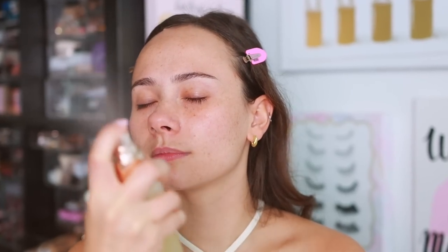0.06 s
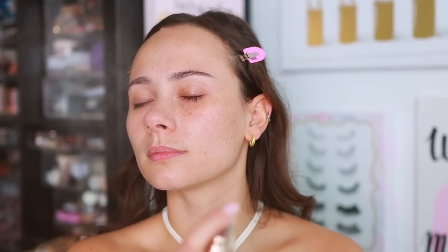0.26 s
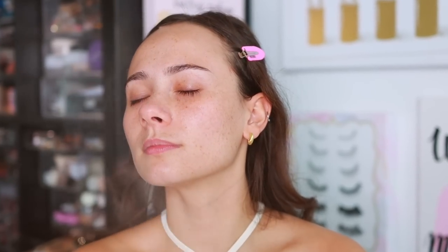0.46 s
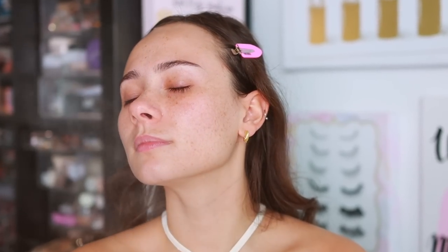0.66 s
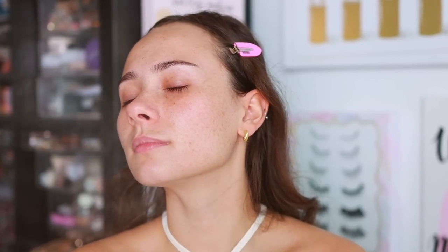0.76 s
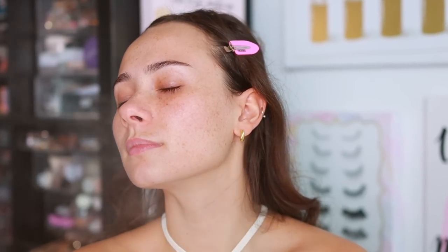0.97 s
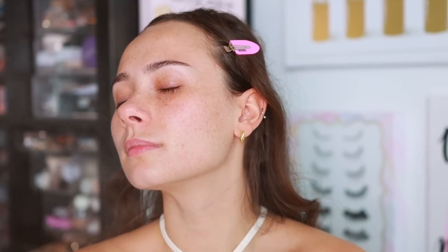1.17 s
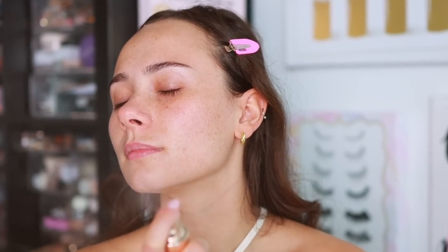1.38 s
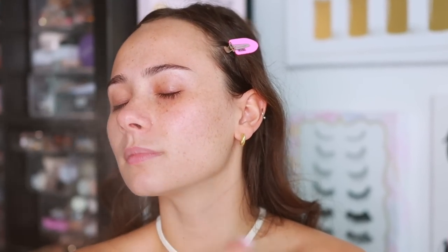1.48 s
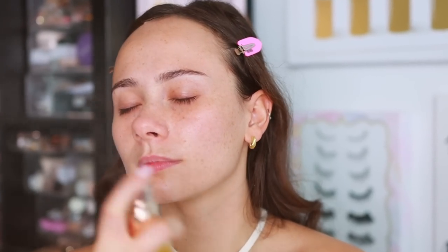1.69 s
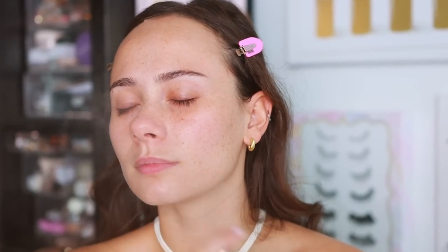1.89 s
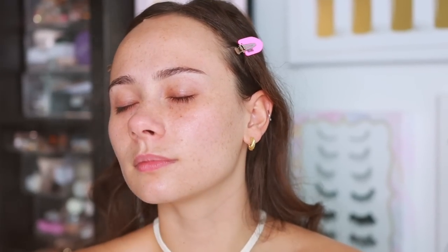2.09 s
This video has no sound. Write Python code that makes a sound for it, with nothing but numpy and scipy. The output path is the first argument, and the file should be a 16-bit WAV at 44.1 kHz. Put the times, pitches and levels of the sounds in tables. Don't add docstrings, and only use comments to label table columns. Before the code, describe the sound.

A small finger-pump mist bottle is pressed five times close to the microphone, each press a short bright hiss, followed by soft plunger knocks and valve ticks, in a quiet furnished room with faint low rumble.

```python
import sys
import numpy as np
from scipy import signal
from scipy.fft import rfft, irfft
from scipy.io import wavfile
from scipy.ndimage import uniform_filter1d

SR = 44100
rng = np.random.default_rng(int(sys.argv[2]) if len(sys.argv) > 2 else 0)


def convert_level_to_amplitude(level_db):
    exponent = np.asarray(level_db, float) / 20
    return 10 ** exponent


def generate_wav(sig):
    pcm = np.round(np.clip(np.atleast_2d(sig).T, -1, 1) * 32767).astype(np.int16)
    wavfile.write(sys.argv[1], SR, pcm)


N = 94550

# start_s, stop_s, top_level_db, top_at_share_of_press, whistle_db
PRESSES = [
    (0.067, 0.2, -34.5, 0.66, -10),
    (0.47, 0.622, -30.5, 0.43, -6),
    (0.911, 1.084, -32, 0.63, -6.5),
    (1.412, 1.566, -33, 0.53, -11),
    (1.836, 2.014, -34.5, 0.53, -6.5),
]
# level_db, highest_hz
REFILLS = [
    (10, 13000),
    (2.5, 14500),
    (3.5, 10900),
    (1.5, 18000),
    (4, 10600),
]
# frequency_hz, density_db
JET_SPECTRUM = [(1000, -44.5), (1400, -17), (1700, -6.5), (2400, -3), (7300, 2), (10400, -6.5), (13000, -1),
                (16000, -13.5)]
# frequency_hz, width_hz, level_db, rise_over_press_hz
NOZZLE_MODES = [(8356, 1400, 0, 501.5), (12530, 3500, -20, 203.5), (6130, 500, -22.5, 2.5)]
# start_s, peak_db, pitch_hz, length_s
PIPS = [(0.069, -55.5, 2130, .004), (0.469, -56, 2000, 0.0023), (.624, -27, 1843, 0.0051),
        (0.9117, -46, 1900, 0.0061), (1.413, -55.5, 1800, .004), (1.639, -64.5, 2000, 0.01),
        (1.837, -49.5, 1880, 0.0066), (2.0272, -35.5, 1905, 0.0041), (2.0816, -41.5, 2200, 0.0038),
        (2.089, -48.5, 2000, 0.0036), (2.12, -64, 3860, 0.003)]
# start_s, peak_db, blow_pitch_hz, low_modes_db, high_modes_db
KNOCKS = [
    (0.2111, -27, 950, -28.5, -10.5),
    (0.628, -18, 1017, -24, -11),
    (1.1172, -22.5, 1080, -10.5, -29),
    (2.0299, -29.5, 850, -6.5, 1),
]
# frequency_hz, level_db, t60_s
BOTTLE_LOW = [(311, -1, 0.014), (582, 6, 0.013)]
BOTTLE_MID = [(884, -6.5, 0.025), (1270, -23, 0.027)]
BOTTLE_HIGH = [(2000, 1, 0.011), (3060, 1.5, 0.0099), (4140, -3.5, 0.01), (5640, -19, 0.0031)]
# start_s, peak_db, upper_hz, lower_hz, lower_level_db
TICKS = [
    (.26, -25, 11850, 8740, 2.5),
    (0.6702, -31, 12500, 7850, -3.5),
    (1.6246, -31, 12300, 9300, -2),
    (2.0296, -27, 9450, 6000, -2),
]
# start_s, length_s, level_db, frequency_hz, width_hz
RUBS = [
    (.001, .055, -74, 4100, 700),
    (2.055, .05, -64, 10100, 700),
]
# frequency_hz, t60_s
ROOM_DECAY = [(300, .3), (1000, 0.21), (3000, .22), (8000, 0.24), (15000, 0.17)]
# time_s, level_db
RUMBLE_LEVEL = [(0, -49.5), (.1, -56), (.3, -56.5), (.55, -57.5), (.7, -58.5), (.9, -61), (1.1, -63),
                (1.25, -65), (1.399, -61.5), (1.68, -61), (1.852, -71.5), (1.92, -57), (1.98, -65.5),
                (2.14, -67.5)]
# frequency_hz, width_hz, level_db
ROOM_TONES = [(170, 10, -9), (208, 10, -8), (300, 18, -10), (416, 14, -8), (459, 12, -9), (568, 12, -10)]
# frequency_hz, density_db
AIR_SPECTRUM = [(700, -8.5), (960, -12.5), (1230, -20), (1620, -20.5), (2300, -25.5), (8000, -32),
                (14500, -36), (15600, -52.5)]
# frequency_hz, density_db
RUMBLE_SPECTRUM = [(100, -33), (140, -17), (200, -11), (300, -2.5), (410, 3), (570, -5), (900, -16.5),
                   (1500, -71.5)]
# frequency_hz, density_db
DEEP_SPECTRUM = [(25, -29.5), (60, -13), (90, -8), (130, -2.5), (220, 4.5), (400, -42)]


def evened(x):
    return x / np.sqrt(np.mean(x ** 2) + 1e-20)


def read(points, hz):
    f, value = np.transpose(points)
    return np.interp(np.log(hz + 1), np.log(f + 1), value)


def coloured(x, spectrum, skirt_db):
    hz = np.fft.rfftfreq(len(x), 1 / SR)
    octaves_below = np.maximum(np.log2(spectrum[0][0] / (hz + 1)), 0)
    gain = convert_level_to_amplitude(read(spectrum, hz) - skirt_db * octaves_below)
    return evened(irfft(rfft(x) * gain, len(x)))


def add(mix, s, sound):
    part = mix[round(s * SR):][:len(sound)]
    part += sound[:len(part)]


def resonate(x, hz, width):
    turn = np.exp(2j * np.pi * np.cumsum(hz * np.ones(len(x))) / SR)
    r = np.exp(-np.pi * width / SR)
    return 2 * (turn * signal.lfilter([1 - r], [1, -r], x / turn + 1e-18)).real


def wander(seconds):
    span = max(round(seconds * SR), 1)
    return evened(uniform_filter1d(uniform_filter1d(rng.standard_normal(N), span), span))


def turbulence():
    spits_per_s, spit_samples = 180, round(.0006 * SR)
    spits = (rng.random(N) < spits_per_s / SR) * np.minimum(rng.exponential(1, N), 4)
    spits = uniform_filter1d(spits, spit_samples) * spit_samples
    return rng.standard_normal(N) * convert_level_to_amplitude(1.0 * wander(.002) + 1.5 * spits)


def nozzle(noise, t, length, whistle_db):
    rings = np.zeros(len(noise))
    for hz, width, db, rise_hz in NOZZLE_MODES:
        pitch_hz = hz + rise_hz * t / length
        mode = resonate(resonate(noise, pitch_hz, width), pitch_hz, width)
        rings += convert_level_to_amplitude(db + whistle_db) * evened(mode)
    return rings


def jet(noise, wide):
    out = np.zeros(N)
    open_s, cut_s = .026, 0.013
    for start, stop, top_db, top_at, whistle_db in PRESSES:
        length, at = stop - start, round(start * SR)
        t = np.arange(0, length + cut_s, 1 / SR)
        times = [0, open_s, max(top_at * length, open_s + .005), length]
        level_db = np.interp(t, times, [-36, -2, 0, -7.5])
        rings = nozzle(noise[at:at + len(t)], t, length, whistle_db)
        gate = np.clip(t / 0.0062, 0, 1) * np.clip((length + cut_s - t) / cut_s, 0, 1)
        add(out, start, convert_level_to_amplitude(top_db + level_db) * gate * evened(wide[at:at + len(t)] + rings))
    return out


def refill(wide):
    out = np.zeros(N)
    stroke_s, end_s = 0.065, 0.035
    t = np.arange(0, stroke_s + end_s, 1 / SR)
    for (start, stop, top_db, _, _), (refill_db, highest_hz) in zip(PRESSES, REFILLS):
        level_db = top_db + refill_db - 19 - 12 * t / stroke_s
        fade = convert_level_to_amplitude(level_db) * np.clip((t[-1] - t) / end_s, 0, 1)
        flow = wide[-len(t) - round(start * SR):][:len(t)]
        lowpass = signal.butter(8, highest_hz, fs=SR, output="sos")
        add(out, stop, fade * signal.sosfilt(lowpass, flow))
    return out


def ring(modes, t):
    return sum(convert_level_to_amplitude(db - 60 * t / t60) * np.sin(2 * np.pi * hz * t) for hz, db, t60 in modes)


def plunger_knocks(t):
    out = np.zeros(N)
    blow_t60, blow_rise_s = 0.0094, 0.00047
    for s, db, blow_hz, low_db, high_db in KNOCKS:
        grip_db = -0.27 * (low_db + 22.5)
        body = ring([(blow_hz, 0, blow_t60)], t) + convert_level_to_amplitude(grip_db) * ring(BOTTLE_MID, t)
        body += convert_level_to_amplitude(low_db) * ring(BOTTLE_LOW, t) + convert_level_to_amplitude(high_db) * ring(BOTTLE_HIGH, t)
        rise = np.sin(np.pi / 2 * np.minimum(t / blow_rise_s, 1)) ** 2
        add(out, s, -convert_level_to_amplitude(db) * body * rise)
    return out


def valve_ticks(t):
    out = np.zeros(N)
    width_hz, t60, rise_s = 3000, .007, .0003
    for s, db, top_hz, low_hz, low_db in TICKS:
        snap = np.zeros(len(t))
        puff = rng.standard_normal(len(t)) * convert_level_to_amplitude(-60 * t / t60) * np.minimum(t / rise_s, 1)
        for hz, part_db in ((top_hz, 0), (low_hz, low_db)):
            part = puff
            for _ in range(3):
                part = resonate(part, hz, width_hz)
            snap += convert_level_to_amplitude(part_db) * part
        add(out, s, convert_level_to_amplitude(db) * snap / abs(snap).max())
    return out


def valve_pips(t):
    out = np.zeros(N)
    for s, db, hz, length in PIPS:
        swell = np.sin(np.pi * np.minimum(t / length, 1) ** 0.59) ** 2
        add(out, s, convert_level_to_amplitude(db) * swell * np.sin(2 * np.pi * hz * t))
    return out


def finger_rubs(t):
    out = np.zeros(N)
    for s, length, db, hz, width in RUBS:
        rub = evened(resonate(resonate(rng.standard_normal(len(t)), hz, width), hz, width))
        add(out, s, convert_level_to_amplitude(db) * rub * np.sin(np.pi * np.minimum(t / length, 1) ** .5))
    return out


def pump():
    t = np.arange(0, .1, 1 / SR)
    parts = plunger_knocks(t) + valve_ticks(t) + valve_pips(t) + finger_rubs(t)
    return signal.sosfilt(signal.butter(4, 240, "high", fs=SR, output="sos"), parts)


def room(x):
    taps = np.zeros(SR // 2)
    at = np.arange(round(.003 * SR), len(taps) - 16, 16)
    taps[at + rng.integers(0, 16, len(at))] = rng.choice([-1., 1.], len(at))
    hz, t, z = signal.stft(taps, SR, nperseg=256)
    decay = convert_level_to_amplitude(-60 * t / read(ROOM_DECAY, hz)[:, None])
    tail = signal.istft(z * decay, SR, nperseg=256)[1]
    return signal.fftconvolve(x, tail / np.linalg.norm(tail))[:N]


def background():
    lumps = rng.standard_normal(N) * convert_level_to_amplitude(2.2 * wander(0.011))
    rumble = coloured(lumps, RUMBLE_SPECTRUM, 12)
    tones = sum(convert_level_to_amplitude(db) * evened(resonate(rumble, hz, w)) for hz, w, db in ROOM_TONES)
    rumble = evened(rumble + tones)
    level_db = np.interp(np.arange(N) / SR, *np.transpose(RUMBLE_LEVEL))
    deep = coloured(rng.standard_normal(N), DEEP_SPECTRUM, 6)
    deep_db = -74 + 0.85 * (level_db + 60)
    air = coloured(rng.standard_normal(N) * convert_level_to_amplitude(0.95 * wander(0.012)), AIR_SPECTRUM, 4)
    return convert_level_to_amplitude(level_db + 1.15) * rumble + convert_level_to_amplitude(deep_db) * deep + convert_level_to_amplitude(-73.5) * air


def scene():
    noise = turbulence()
    wide = coloured(noise, JET_SPECTRUM, 24)
    hiss = jet(noise, wide) + refill(wide)
    parts = pump()
    shaded = signal.lfilter(*signal.butter(1, 6000, fs=SR), parts)
    echo = room(convert_level_to_amplitude(-14) * hiss + convert_level_to_amplitude(-10.5) * shaded)
    mid = hiss + parts + echo + background()
    side = convert_level_to_amplitude(-39.5) * room(mid) + convert_level_to_amplitude(-24) * np.gradient(parts)
    return np.array([mid + side, mid - side])


def top_cut(x):
    return signal.sosfilt(signal.butter(12, 16420, fs=SR, output="sos"), x)


def record(dry):
    lowpass = signal.firwin(511, 16050, window=("kaiser", 9), fs=SR)
    limited = signal.oaconvolve(dry, lowpass[None], "same")
    return top_cut(limited)


dry = scene()
out = record(dry)
generate_wav(out)
```